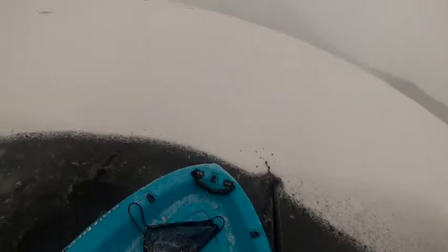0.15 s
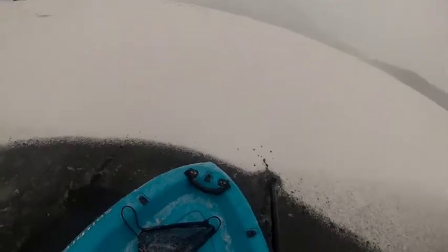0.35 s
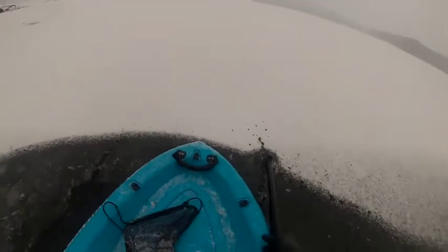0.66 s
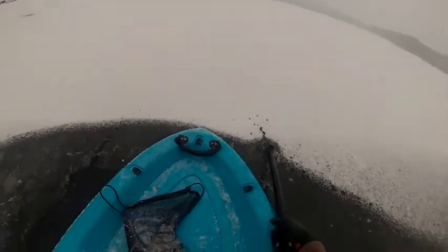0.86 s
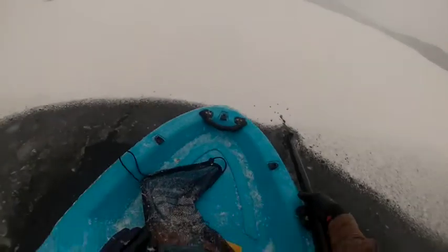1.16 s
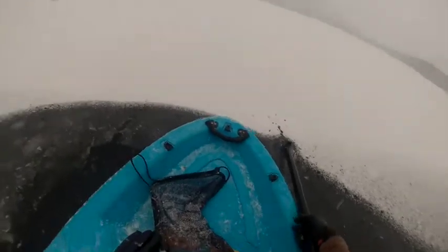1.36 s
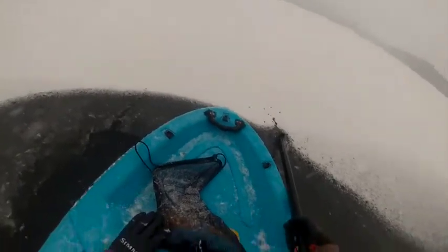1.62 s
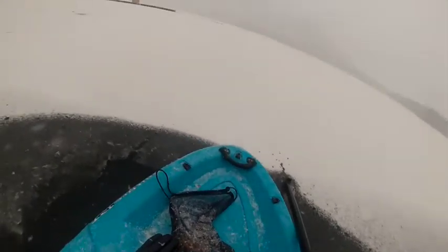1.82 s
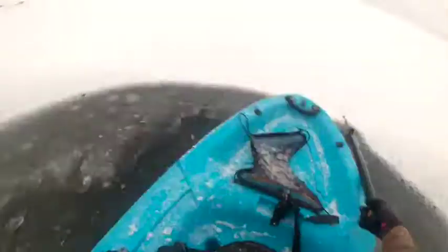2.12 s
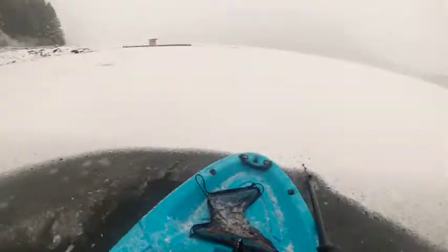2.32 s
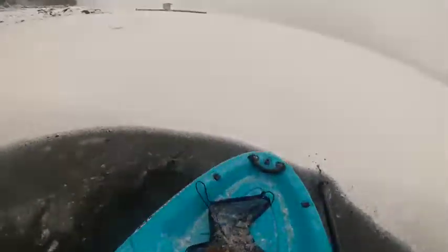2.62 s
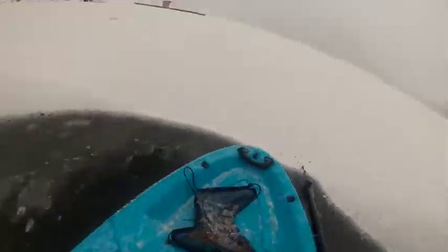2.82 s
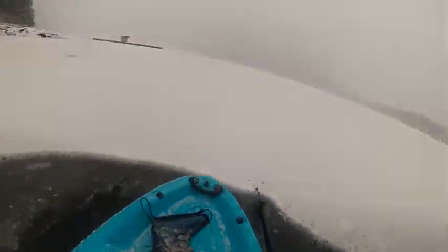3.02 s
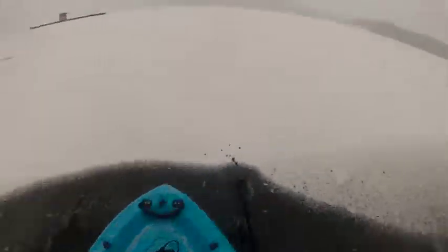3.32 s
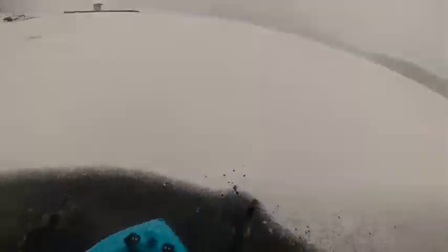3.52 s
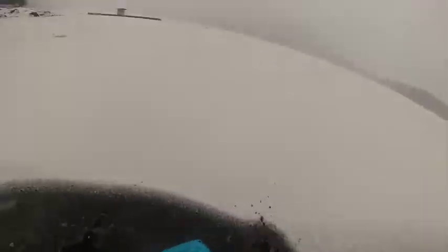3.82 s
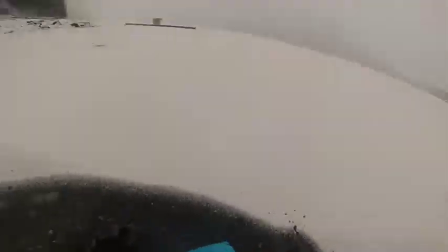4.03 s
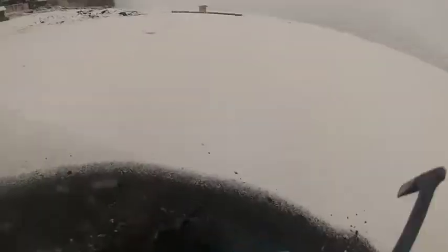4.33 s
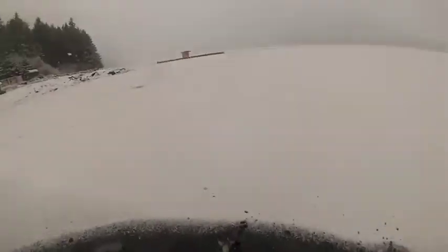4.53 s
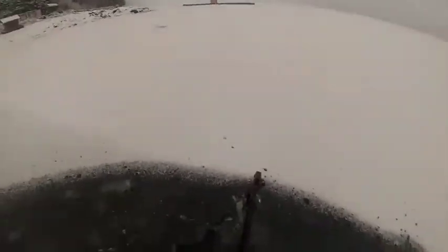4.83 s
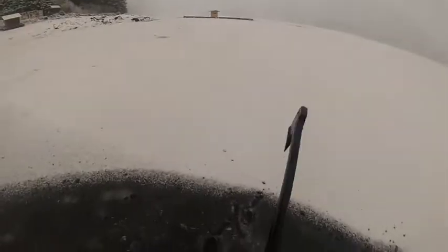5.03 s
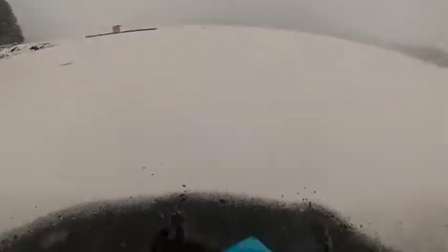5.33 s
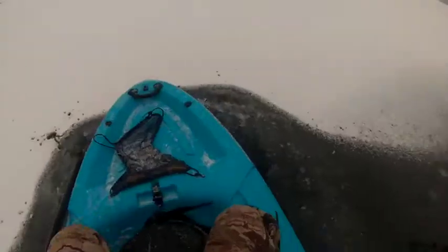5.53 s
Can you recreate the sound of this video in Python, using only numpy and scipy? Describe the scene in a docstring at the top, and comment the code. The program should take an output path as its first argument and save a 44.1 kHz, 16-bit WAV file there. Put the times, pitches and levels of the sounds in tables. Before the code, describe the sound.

A kayak sits in ticking, fizzing slush, then abruptly grinds through thin ice with knocks, snaps, judders and bright hissing scrapes.

```python
"""Kayak in thin sea ice

A plastic kayak lies in slushy sea ice, wind on the microphone, wet crystals fizzing and ticking along the side.
Then the scene changes abruptly: a kayak forces its way through the thin sheet: hull rumble, judder, sharp
cracks, scrapes. Wind, water and rumble are coloured noise; slush and crumbling ice are streams of tiny ringing
grains; the hull and the sheet are banks of decaying modes, kicked by each slip and each fracture."""
import sys
import numpy as np
from scipy import signal
from scipy.fft import rfft, irfft
from scipy.io import wavfile
from scipy.ndimage import uniform_filter1d, map_coordinates

SR = 44100
rng = np.random.default_rng(int(sys.argv[2]) if len(sys.argv) > 2 else 0)


def to_wav(sig):
    """Store sig (one row per channel, or 1-D mono) as 16-bit WAV at the path in sys.argv[1].

    Samples outside -1..1 are clipped; the rate is SR.
    """
    pcm = np.clip(np.atleast_2d(sig), -1, 1) * 32767
    pcm = np.round(pcm).astype(np.int16)
    wavfile.write(sys.argv[1], SR, pcm.T)  # frames by channels


N = 249606
TIME = np.arange(N) / SR
PUSH_S = 2.088   # the scene changes here to the push through the sheet


def from_db(db):
    """Decibels to gain."""
    return 10 ** (np.asarray(db) / 20)


def rms_one(x):
    """Scale to unit rms."""
    return x / np.sqrt(np.mean(x ** 2) + 1e-20)


def in_time(rows):
    """One curve per column after the first, joined by straight lines."""
    time_s, *columns = np.transpose(rows)
    return [np.interp(TIME, time_s, column) for column in columns]


def add(out, start_s, sound):
    """Mix a sound in at a time."""
    at = max(0, round(start_s * SR))
    out[at:at + len(sound)] += sound[:max(0, N - at)]


def swell(start_s, rise_s, hold_s, fall_s):
    """Rise, hold and fall between 0 and 1."""
    corners_s = start_s + np.cumsum([0, rise_s, hold_s, fall_s])
    return np.interp(TIME, corners_s, [0, 1, 1, 0])


def dying(start_s, decay_s):
    """Starts at 1 and dies away exponentially."""
    return (TIME >= start_s) * np.exp(-np.abs(TIME - start_s) / decay_s)


def drift(rate_hz):
    """Slow chance: random knots of spread 1, joined by straight lines."""
    knots = rng.standard_normal(N // 20)
    return np.interp(TIME * rate_hz, np.arange(len(knots)), knots)


def colour(x, points, size=8192):
    """Causal (minimum-phase) filter with the given spectrum; white noise keeps its level."""
    pitch_hz, level_db = np.transpose(points)
    grid_hz = np.maximum(np.arange(size // 2 + 1) * SR / size, 1)
    grid_db = np.interp(np.log(grid_hz), np.log(pitch_hz), level_db)
    cepstrum = irfft(np.log(from_db(grid_db)))
    # keeping only the doubled first half of the cepstrum gives minimum phase
    response = irfft(np.exp(rfft(2 * cepstrum[:size // 2], size)))
    return signal.fftconvolve(x, response / np.linalg.norm(response))[:N]


def low_noise(points, span_s):
    """Coloured noise whose level is even over the given span."""
    noise = colour(rng.standard_normal(N), points)
    return noise / np.sqrt(uniform_filter1d(noise ** 2, int(span_s * SR)) + 1e-6)


def patchy_noise(patchy_db, per_s, width_hz, size=256):
    """White noise whose colour shifts: patches of the spectrum swell and sink on their own; rms 1."""
    hz, s, frames = signal.stft(rng.standard_normal(N), SR, nperseg=size)
    places = np.meshgrid(hz / width_hz, s * per_s, indexing="ij")
    patches = map_coordinates(rng.standard_normal((size, 4 * size)), places, order=1, mode="wrap")
    noise = signal.istft(frames * from_db(patchy_db * patches), SR, nperseg=size)[1]
    return rms_one(noise[:N])


def grains(per_s, spread_db, smooth, patchy_db=4.0, count=16):
    """Tiny fractures of uneven size, each ringing in one of several bands, over a patchy noise bed; rms 1."""
    at = np.flatnonzero(rng.random(N) < per_s / SR)
    sizes_db = spread_db * np.minimum(rng.exponential(1, len(at)), 4)
    sizes = from_db(sizes_db) * rng.choice([-1, 1], len(at))
    band_of = rng.integers(0, count, len(at))
    edges_hz = np.linspace(np.sqrt(200), np.sqrt(17000), count + 1) ** 2
    out = np.zeros(N)
    for k in range(count):
        clicks = np.zeros(N)
        clicks[at[band_of == k]] = sizes[band_of == k]
        band = signal.butter(1, edges_hz[k:k + 2], "band", fs=SR)
        out += signal.lfilter(*band, clicks + 1e-18)
    bed = patchy_noise(patchy_db, per_s=60, width_hz=940)   # stands for countless smaller fractures
    return rms_one(rms_one(out) + smooth * bed)


def ring(clicks, pitch_hz, t60_s):
    """A unit click sets a sine of height about 1 ringing, down 60 dB after t60_s."""
    r = np.exp(-np.log(1000) / (t60_s * SR))
    w = 2 * np.pi * pitch_hz / SR
    return signal.lfilter([0, np.sin(w)], [1, -2 * r * np.cos(w), r * r], clicks + 1e-18)


# Spectrum of the wind's pressure on the microphone: pitch_hz, level_db
WIND_COLOUR = [(10, 0), (20, 4), (32, 0), (45, -7), (60, -18), (90, -31), (170, -42), (1000, -90)]
# Spectrum of the gust's rustle on the microphone: pitch_hz, level_db
RUSTLE_COLOUR = [(200, 7), (550, -3), (1000, -3.5), (2300, -3.5), (4300, -14.5), (6000, -24), (12000, -25)]
WIND_DB, WIND_RISE_DB_PER_S, WIND_LUMPS_DB = -37.5, 2, 5   # level at the start, slow freshening, spread
GUST_S, GUST_RISE_S, GUST_HOLD_S, GUST_FALL_S = 1.46, 0.064, 0.11, 0.043   # one gust buffets the microphone
# the flutter is slower by the share FLUTTER_SAG at the gust's edges
GUST_DB, FLUTTER_HZ, FLUTTER_SAG = -24.5, 42.2, .28


def wind(rustle_db=-29.5, eddy_db=-2.0):
    """Lumpy pressure on the microphone; the gust sheds eddies, faster as it grows, and rustles."""
    lumps_db = WIND_DB + WIND_RISE_DB_PER_S * TIME + WIND_LUMPS_DB * drift(9.08)
    lumps = from_db(lumps_db) * low_noise(WIND_COLOUR, span_s=0.0765)
    gust = swell(GUST_S, GUST_RISE_S, GUST_HOLD_S, GUST_FALL_S)
    flutter_hz = FLUTTER_HZ * (1 - FLUTTER_SAG * (1 - gust))
    wavering_hz = flutter_hz * (1 + 0.1654 * drift(39.93))
    eddies = np.sin(2 * np.pi * np.cumsum(wavering_hz) / SR)
    rustle = from_db(rustle_db) * colour(grains(per_s=1600, spread_db=4.5, smooth=1.35), RUSTLE_COLOUR)
    buffeting = from_db(GUST_DB) * gust * (from_db(eddy_db) * rms_one(eddies) + rustle)
    lull = np.clip((PUSH_S - TIME) / 0.022, 0, 1)   # silent once the scene changes
    return lull * (lumps + buffeting)


# Slush along the side, levels before gain: time_s, fizz_db, wash_db
SLUSH = [(0.0, -61.5, -60), (0.67, -63.5, -66), (0.81, -61.5, -66.5), (1.2, -63.5, -71), (1.37, -64, -56.5),
         (1.49, -64, -61), (1.84, -65.5, -63), (2.08, -69, -61)]
# Spectrum of the crystals' fizz: pitch_hz, level_db
SLUSH_COLOUR = [(700, -14), (1200, -9), (1500, 4.5), (1780, -9.5), (2350, 0.5), (2900, -15.5),
                (3400, -14.5), (4900, -13.5), (5800, -22), (6700, -16.5), (9500, -24), (11500, -19.5),
                (15500, -29.5)]
# Spectrum of the wash of water: pitch_hz, level_db
WASH_COLOUR = [(100, 2.5), (240, 1), (330, -5), (550, -7.5), (900, -16.5), (2000, -30), (4000, -29),
               (7000, -27), (15000, -40)]


def slush(fizz_gain_db=2.5, wash_gain_db=5.0):
    """Wet crystals rub and fizz against the hull over a soft wash of water."""
    fizz_db, wash_db = in_time(SLUSH)
    crystals = grains(per_s=3000, spread_db=4.5, smooth=1.4, patchy_db=2.0)
    fizz = crystals * from_db(fizz_db + 3.2 * drift(45.67) + fizz_gain_db)
    water = grains(per_s=900, spread_db=8.5, smooth=2.75)
    wash = water * from_db(wash_db + 1.0 * drift(31.25) + wash_gain_db)
    return colour(fizz, SLUSH_COLOUR) + colour(wash, WASH_COLOUR)


# Drips and ticks, mostly in the slush and a few during the push, levels before gain: start_s, level_db,
# pitch_hz, t60_s
DRIPS = [(0.032, -31, 854, 0.022), (0.032, -32.5, 1440, 0.023), (0.0586, -34.5, 1430, 0.017),
         (.118, -41.5, 185, 0.033), (0.544, -46, 252, 0.074), (0.4777, -34, 2130, 0.0097),
         (.7673, -39.5, 1510, 0.024), (1.36, -38, 1820, 0.0085), (1.9358, -37.5, 1470, 0.021),
         (1.942, -38, 2230, 0.014), (2.022, -36, 2000, 0.0078), (5.179, -45.5, 1570, 0.02),
         (5.582, -40.5, 1790, 0.011)]


def drips(attack_s=0.00055, gain_db=1.0):
    """Each drip or tick swells at once and rings briefly at one pitch."""
    out, t = np.zeros(N), TIME[:SR // 10]
    for start_s, level_db, pitch_hz, t60_s in DRIPS:
        envelope = (1 - np.exp(-t / attack_s)) * np.exp(-np.log(1000) * t / t60_s)
        add(out, start_s, from_db(level_db + gain_db) * envelope * np.sin(2 * np.pi * pitch_hz * t))
    return out


# The hull rubs through thicker slush: start_s, length_s, fizz_db, bright_hiss_db
RUBS = [(0.24, 0.31, -60.5, -65), (0.609, 0.22, -55.5, -88)]
# Spectrum of the lower, ringing hiss of sliding ice: pitch_hz, level_db
SWISH_COLOUR = [(1000, -6), (3000, -19.5), (4800, -13.5), (5700, 1), (6500, -7), (8800, -6), (10000, -10.5),
                (11500, -24), (16000, -26)]


def rubs(fizz_patchy_db=7.0, hiss_patchy_db=3.0):
    """Thicker slush drags along the side: the fizz swells and fades, with a brighter hiss on top."""
    low, bright = np.zeros((2, N))
    for start_s, length_s, fizz_db, hiss_db in RUBS:
        drag = swell(start_s, length_s / 2, 0, length_s / 2)
        low += from_db(fizz_db) * drag
        bright += from_db(hiss_db) * drag
    fizz = low * grains(per_s=2500, spread_db=3.5, smooth=2.1, patchy_db=fizz_patchy_db)
    hiss = bright * grains(per_s=4000, spread_db=7.0, smooth=1.3, patchy_db=hiss_patchy_db)
    return colour(fizz, SLUSH_COLOUR) + colour(hiss, SWISH_COLOUR)


# The ice cracks, levels before gain: start_s, snap_db, splinter_db
CRACKS = [(0.478, -30.5, -64), (0.869, -25, -61), (0.923, -34, -55.5), (1.331, -37, -59), (1.358, -35, -67),
          (1.927, -36.5, -58), (2.107, -37, -56), (2.229, -36, -58), (2.294, -43, -56), (2.566, -37, -50),
          (2.635, -36.5, -51.5), (2.674, -37, -62), (2.811, -42.5, -63), (3.16, -39.5, -55),
          (3.218, -34, -45), (3.226, -32.5, -45), (3.376, -50, -55), (3.602, -24, -32.5),
          (3.627, -32.5, -59), (3.782, -41, -42), (3.885, -32.5, -49), (4.014, -24.5, -35.5),
          (4.041, -30, -51), (4.269, -26.5, -37), (4.476, -34, -37), (4.551, -29.5, -40),
          (4.794, -27.5, -44), (4.9, -35, -56), (4.936, -33.5, -48), (5.114, -41, -46.5),
          (5.267, -32.5, -45), (5.276, -22.5, -36)]
# Spectrum of the snapping sheet: pitch_hz, level_db
SHEET_COLOUR = [(250, 2), (650, -12), (1100, -2.5), (1800, 3), (2600, 2), (4000, -1.5), (6000, -2),
                (10000, -16)]
# Spectrum of the bright splinters: pitch_hz, level_db
SPLINTER_COLOUR = [(1500, -4), (4500, -17), (5800, -1.5), (7200, 0.5), (8600, 10.5), (10000, -9.5),
                   (11600, 4.5), (14000, -2), (16000, -10)]
JUMP_S, JUMP_LOSS_DB = 0.0018, 6.5   # a fracture runs on in jumps, each weaker than the last


def cracks(snap_s=0.00067, crumble_s=0.01, crumble_db=-14, snap_gain_db=-11.0, splinter_gain_db=5.5, count=4):
    """A fracture runs in a few jumps, each decaying within about a millisecond, while its edges crumble."""
    snaps, splinters, t = np.zeros(N), np.zeros(N), TIME[:SR // 12]
    crumbs = grains(per_s=5000, spread_db=7.5, smooth=0.93)
    for start_s, snap_db, splinter_db in CRACKS:
        gaps_s = JUMP_S * rng.uniform(.5, 2, count)
        lags_s = np.cumsum(gaps_s) - gaps_s[0]
        jumps = np.zeros(len(t))
        for k, lag_s in enumerate(lags_s):
            jumps += from_db(-JUMP_LOSS_DB * k) * (t >= lag_s) * np.exp(-np.abs(t - lag_s) / snap_s)
        at = round(start_s * SR)
        crumbling = from_db(crumble_db) * np.exp(-t / crumble_s) * crumbs[at:at + len(t)]
        burst = jumps * rng.standard_normal(len(t)) + crumbling
        add(snaps, start_s, from_db(snap_db + snap_gain_db) * burst)
        add(splinters, start_s, from_db(splinter_db + splinter_gain_db) * burst)
    return colour(snaps, SHEET_COLOUR) + colour(splinters, SPLINTER_COLOUR)


# The push through the sheet, levels before gain: time_s, hull_rumble_db, crunch_db
PUSH = [(2.13, -42.5, -62), (2.29, -41, -64.5), (2.45, -41.5, -68), (2.69, -42.5, -63.5),
        (2.89, -47.5, -66), (3.04, -43.5, -67), (3.31, -38, -62), (3.67, -44, -68.5), (3.93, -39, -68),
        (5.01, -41.5, -66.5), (5.22, -41, -67.5), (5.66, -47, -67)]
# Spectrum of the hull's rumble: pitch_hz, level_db
RUMBLE_COLOUR = [(25, -23), (55, 1.5), (100, 3.5), (170, 0.5), (240, -4), (310, -15), (400, -24),
                 (550, -34), (800, -56.5), (1500, -53)]
# Spectrum of coarse crumbling ice: pitch_hz, level_db
CRUNCH_COLOUR = [(300, 11.5), (550, 11.5), (850, 4.5), (1300, 2), (2000, -2.5), (3500, -8), (6000, -32),
                 (10000, -24)]
# Spectrum of fine ringing grit: pitch_hz, level_db
GRIT_COLOUR = [(2000, -24), (5000, -9), (7300, -9), (8200, 1.5), (9000, 4.5), (10200, -13), (11800, -6.5),
               (13300, -1.5), (15500, -21), (17000, -1)]
GRIT_DB = -69   # fine grit under the hull, mean level; it follows the crunch's swing


def grinding(rumble_gain_db=2.5, crunch_gain_db=5.0):
    """The moving hull rumbles in lumps while ice crumbles under it; coarse and fine grains surge partly together."""
    rumble_db, crunch_db = in_time(PUSH)
    grit_db = GRIT_DB + crunch_db - crunch_db[TIME > PUSH_S].mean()
    surge = drift(45)
    rumble_level = from_db(rumble_db + rumble_gain_db + 1.6 * drift(35))
    rumble = rumble_level * low_noise(RUMBLE_COLOUR, span_s=0.15)
    crunch_level = from_db(crunch_db + crunch_gain_db + 1.3 * surge)
    crunch = crunch_level * grains(per_s=1500, spread_db=3.5, smooth=2.9, patchy_db=5.5)
    grit_level = from_db(grit_db + 1.1 * surge + 3.8 * drift(30))
    grit = grit_level * grains(per_s=2700, spread_db=6.0, smooth=1.8, patchy_db=5.5)
    return rumble + colour(crunch, CRUNCH_COLOUR) + colour(grit, GRIT_COLOUR)


# Modes of the ice sheet: pitch_hz, level_db, t60_s
SHEET = [(910, -1.5, 0.022), (1086, -1, 0.039), (1300, 3, 0.01), (1527, -15.5, 0.082)]
# knock for a snap listed at KNOCK_AT_DB, and dB more knock per dB of snap
KNOCK_DB, KNOCK_AT_DB, KNOCK_GROWTH = -34, -23.5, 1.74


def knocks(uneven_db=4.0):
    """During the push each fracture releases the bent sheet, which rings with a short woody knock."""
    start_s, snap_db, _ = np.transpose(CRACKS)
    knock_db = KNOCK_DB + KNOCK_GROWTH * (snap_db - KNOCK_AT_DB)
    out = np.zeros(N)
    for k, (pitch_hz, mode_db, t60_s) in enumerate(SHEET):
        kick_db = knock_db + mode_db + uneven_db * rng.standard_normal(len(start_s))
        kicks = np.zeros(N)
        kicks[(start_s * SR).astype(int)] = (start_s > PUSH_S) * from_db(kick_db)
        out += (-1) ** k * ring(kicks, pitch_hz, t60_s)   # neighbouring modes in opposite phase
    return out


# Broken edges scrape past: start_s, length_s, hiss_db, coarse_chips_db
SCRAPES = [(2.166, .07, -45.5, -62), (2.50, 0.16, -65, -50), (2.709, 0.068, -49.5, -56.5),
           (2.892, 0.049, -59, -70), (3.099, 0.064, -45, -52), (3.505, 0.074, -43.5, -59),
           (3.816, .072, -43.5, -48), (4.532, 0.065, -42, -44), (4.941, 0.066, -43.5, -59),
           (5.176, 0.07, -43, -53.5)]
# Spectrum of the scraping hiss: pitch_hz, level_db
SCRAPE_COLOUR = [(2000, -41), (4400, -58), (5400, -6), (6900, -34), (8000, 5.5), (10000, 3), (11300, 3.5),
                 (13000, 4.5), (15500, 1.5)]
SCRAPE_SWELL, SCRAPE_GRIT_DB = 0.19, -5.8   # share of a stroke spent swelling; grit relative to the hiss
CATCH_S = 0.0046   # grit catches at the first touch


def scrapes(hiss_rough_db=1.0, grit_rough_db=2.0):
    """Each stroke shears off a swelling, fading stream of fine crystals, ringing grit and coarse chips."""
    fine, gritty, coarse = np.zeros((3, N))
    for start_s, length_s, hiss_db, chips_db in SCRAPES:
        stroke = swell(start_s, SCRAPE_SWELL * length_s, 0, (1 - SCRAPE_SWELL) * length_s)
        fine += from_db(hiss_db) * stroke ** 1.09
        gritty += from_db(hiss_db + SCRAPE_GRIT_DB) * swell(start_s, CATCH_S, 0, length_s) ** 0.7
        coarse += from_db(chips_db) * stroke ** 1.93
    crystals = grains(per_s=4400, spread_db=15.0, smooth=3.3, patchy_db=6.5)
    hiss = fine * from_db(hiss_rough_db * drift(270)) * crystals
    grit_grains = grains(per_s=3000, spread_db=0.0, smooth=1.6, patchy_db=6.5)
    grit = gritty * from_db(grit_rough_db * drift(160)) * grit_grains
    chips = coarse * grains(per_s=2500, spread_db=2.0, smooth=.7, patchy_db=1.0)
    return colour(hiss, SCRAPE_COLOUR) + colour(grit, GRIT_COLOUR) + colour(chips, CRUNCH_COLOUR)


# The hull judders on the edge of the sheet and crushes it: start_s, length_s, thump_db, grit_db
THUMPS = [(2.515, 0.036, -34.5, -60), (3.106, 0.019, -34.5, -65), (3.16, 0.0071, -34.5, -70),
          (3.222, .023, -22, -54), (3.333, 0.031, -35, -57.5), (3.508, .013, -28, -49.5),
          (3.61, .014, -27.5, -72), (3.659, 0.015, -31.5, -59.5), (3.787, 0.012, -31, -72),
          (4.015, 0.017, -22.5, -46), (4.267, 0.021, -28, -46), (4.48, 0.021, -26.5, -51),
          (4.548, 0.046, -34, -71), (4.799, 0.022, -39, -76), (4.887, .016, -19, -53),
          (4.907, 0.0044, -17, -77), (5.11, 0.021, -31.5, -71), (5.28, .027, -22.5, -41.5)]
STRAIN_S, STRAIN_DB = 0.044, -14   # the shudder starts this long before a thump, and peaks this far below it


def strain():
    """The hull rides up on the edge and shudders more and more until the ice gives."""
    load = np.zeros(N)
    for start_s, length_s, thump_db, _ in THUMPS:
        load += from_db(thump_db + STRAIN_DB) * swell(start_s - STRAIN_S, STRAIN_S, 0, length_s)
    return load * low_noise(RUMBLE_COLOUR, span_s=0.02)


CRUSH_LEAD_S, CRUSH_SWELL_S, CRUSH_FADE_S = 0.0094, 0.0052, 0.042   # the edge starts to give before the thump
CRUSH_CHIPS_DB = -26.5   # coarse chips, relative to the thump
DEBRIS_DB, DEBRIS_DECAY_S = -9, 0.054   # loose grit settles afterwards; relative to the crush


def crushing():
    """Each thump crushes the edge of the sheet into chips and grit, which settles afterwards."""
    gritty, coarse = np.zeros((2, N))
    for start_s, _, thump_db, grit_db in THUMPS:
        crush = swell(start_s - CRUSH_LEAD_S, CRUSH_SWELL_S, 0, CRUSH_FADE_S)
        debris = from_db(DEBRIS_DB) * dying(start_s, DEBRIS_DECAY_S)
        gritty += from_db(grit_db) * (crush + debris)
        coarse += from_db(thump_db + CRUSH_CHIPS_DB) * crush ** 1.64
    roughness = from_db(9.4 * drift(160) - 3.7)   # swings widely about a level 3.7 dB down
    grit = gritty * roughness * grains(per_s=2100, spread_db=2.5, smooth=1.7, patchy_db=7.0)
    chips = coarse * grains(per_s=2000, spread_db=3.5, smooth=0.63, patchy_db=3.5)
    return colour(grit, GRIT_COLOUR) + colour(chips, CRUNCH_COLOUR)


# Modes of the plastic hull: pitch_hz, level_db, t60_s
HULL = [(120, 9, 0.068), (161, 6.5, 0.085), (195.4, 10, 0.036), (268, -4, 0.076), (346, -0.5, 0.018),
        (425, -12.5, 0.018), (690, -29, 0.0066)]
CONTACT_HZ, CONTACT_AT_DB, DB_PER_OCTAVE = 450, -23, 13   # a stronger thump is a harder, brighter contact
HULL_LOWEST_HZ = 67.4   # the hull radiates little below this


def thumps(slip_s=.0065, uneven_db=4.5, count=12):
    """The bow sticks and slips in quick succession; every slip kicks the hull modes."""
    out, size = np.zeros(N), SR // 6
    for start_s, length_s, thump_db, _ in THUMPS:
        hard_hz = min(CONTACT_HZ * 2 ** ((thump_db - CONTACT_AT_DB) / DB_PER_OCTAVE), SR / 10)
        gaps_s = slip_s * rng.uniform(.5, 1.486, count)
        slips_s = np.cumsum(gaps_s) - gaps_s[0]
        force = (slips_s <= length_s) * rng.choice([-1, 1], count)   # no slips after the thump's length
        at = np.minimum(slips_s * SR, size - 1).astype(int)
        body = np.zeros(size)
        for pitch_hz, mode_db, t60_s in HULL:
            kicks = np.zeros(size)
            kicks[at] = force * from_db(mode_db + uneven_db * rng.standard_normal(count))
            body += ring(kicks, pitch_hz, t60_s)
        body = signal.sosfilt(signal.butter(2, hard_hz, fs=SR, output="sos"), body)
        body = signal.sosfilt(signal.butter(1, HULL_LOWEST_HZ, "high", fs=SR, output="sos"), body)
        # energy as of unit rms over the thump's length plus a short tail
        evened = body * np.sqrt((length_s + 0.0087) * SR / np.sum(body ** 2))
        add(out, start_s, from_db(thump_db) * evened)
    return out


SKID_S, SKID_RISE_S, SKID_HOLD_S, SKID_FALL_S, SKID_DB = 5.479, 0.012, 0.021, 0.054, -47.5
COAST_DB, COAST_DECAY_S = -13, 0.2   # the slab coasts on faintly; relative to the skid


def swish():
    """A loose slab skids over the ice with a lower, ringing hiss."""
    skid = swell(SKID_S, SKID_RISE_S, SKID_HOLD_S, SKID_FALL_S)
    slide = skid + from_db(COAST_DB) * dying(SKID_S, COAST_DECAY_S)
    hiss = grains(per_s=6000, spread_db=0.0, smooth=2.1, patchy_db=5.5)
    return colour(from_db(SKID_DB) * slide * hiss, SWISH_COLOUR)


def scene():
    """Two scenes one after the other: lying in slush, then, after an abrupt change of scene, the push through
    the sheet."""
    pushing = np.clip((TIME - PUSH_S) / 0.012 + .5, 0, 1)
    bed = wind() + (1 - pushing) * slush() + pushing * grinding()
    drips_and_rubs = drips() + rubs()
    breaking = cracks() + knocks() + scrapes() + swish()
    hull = strain() + crushing() + thumps()
    return (bed + drips_and_rubs + breaking + hull)[None]


def record(dry, lowest_hz=12, cutoff_hz=16100):
    """The microphone drops the deepest bass; the top is cut steeply."""
    thinned = signal.sosfilt(signal.butter(2, lowest_hz, "high", fs=SR, output="sos"), dry)
    return signal.sosfilt(signal.ellip(10, .2, 80, cutoff_hz, fs=SR, output="sos"), thinned)


dry = scene()
out = record(dry)
to_wav(out)
```